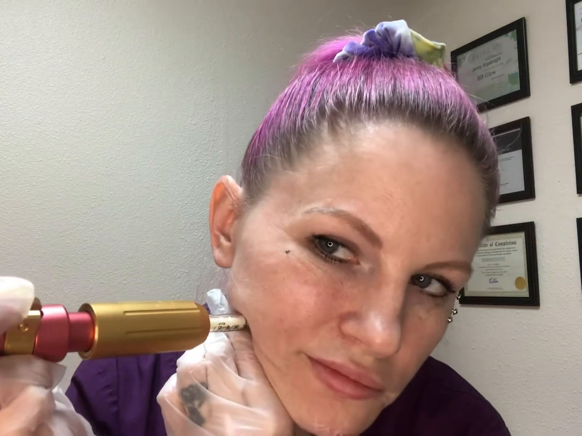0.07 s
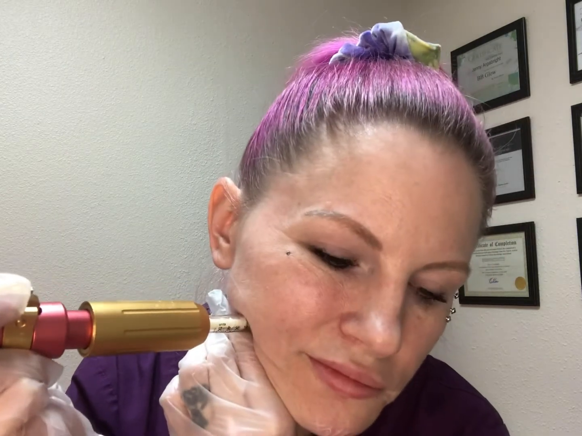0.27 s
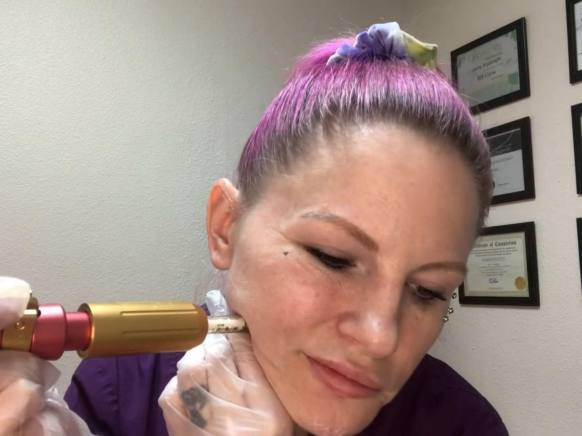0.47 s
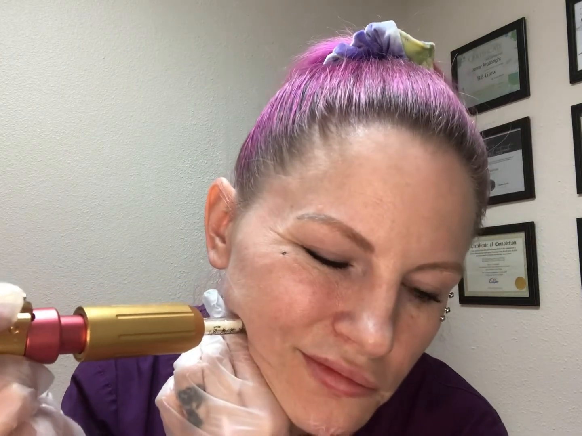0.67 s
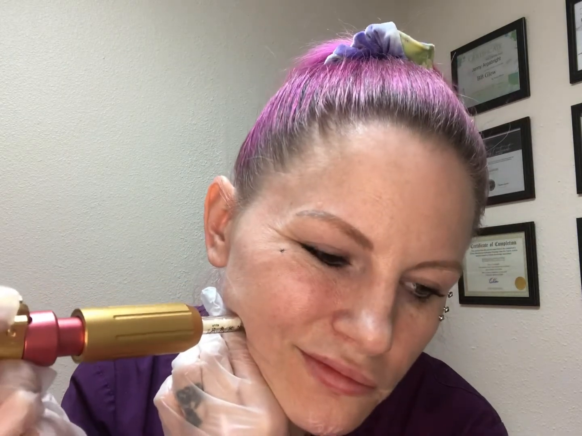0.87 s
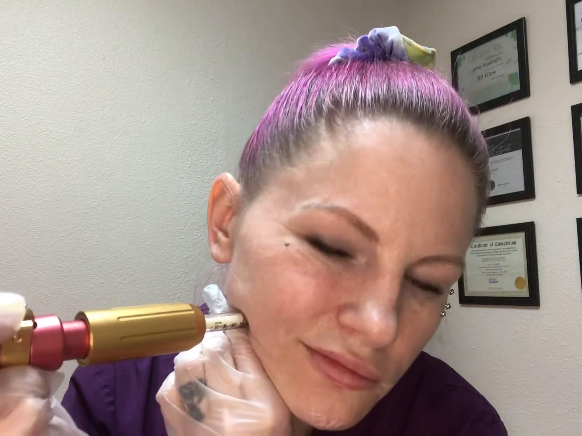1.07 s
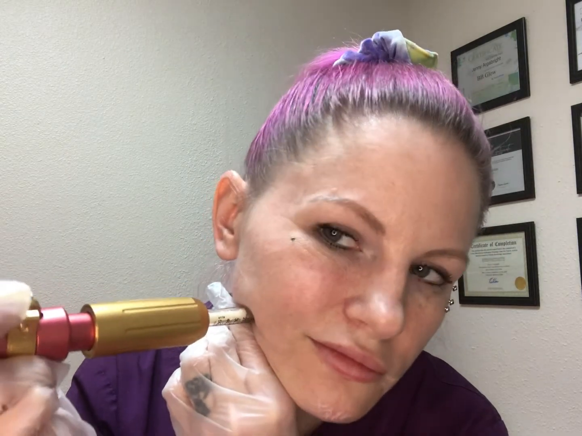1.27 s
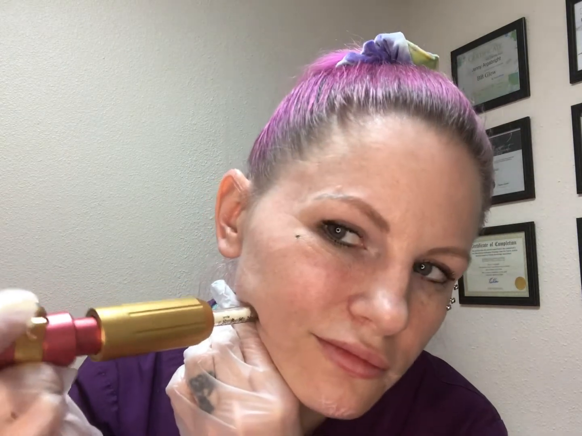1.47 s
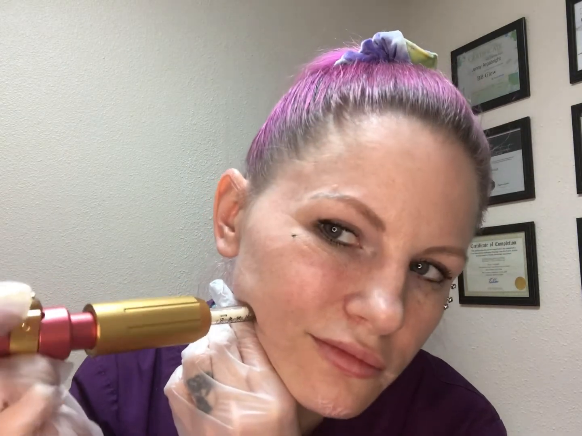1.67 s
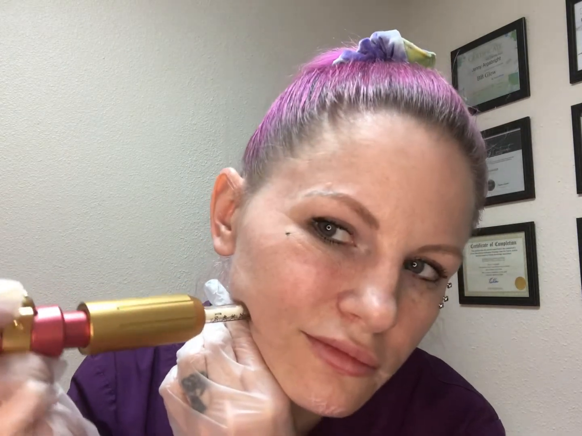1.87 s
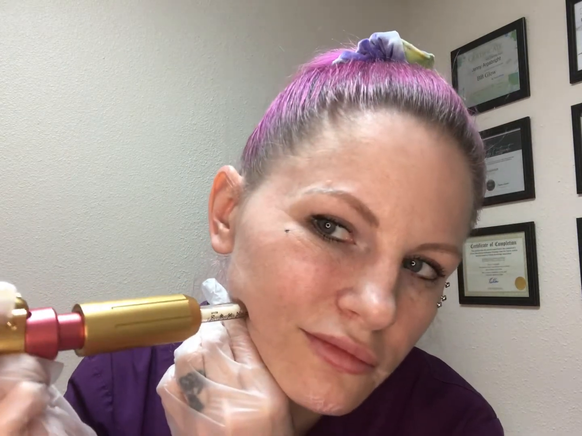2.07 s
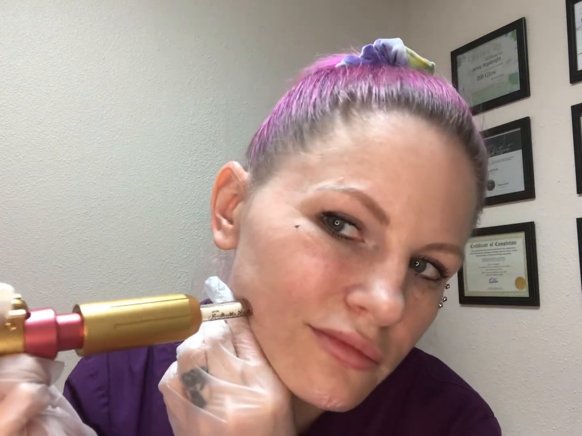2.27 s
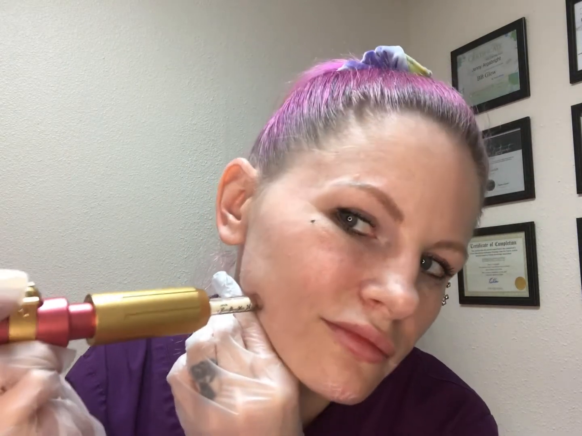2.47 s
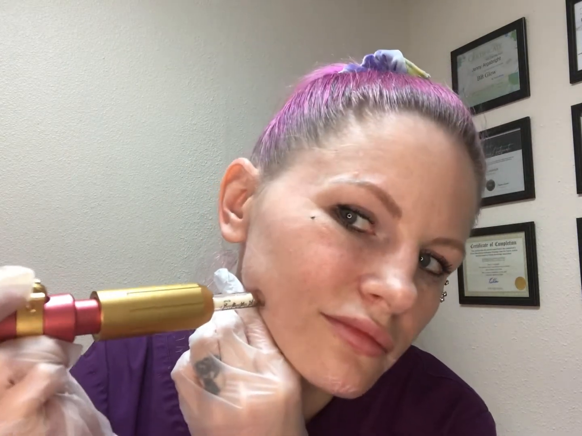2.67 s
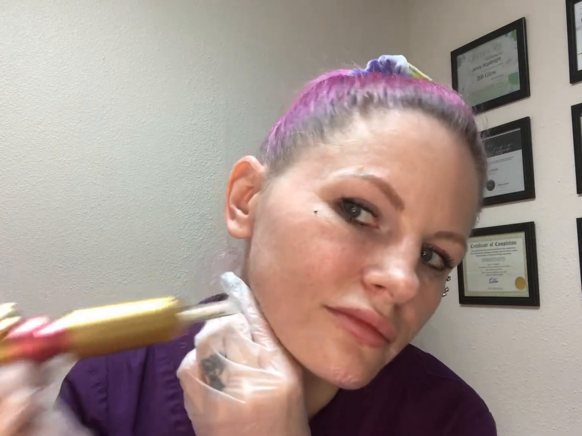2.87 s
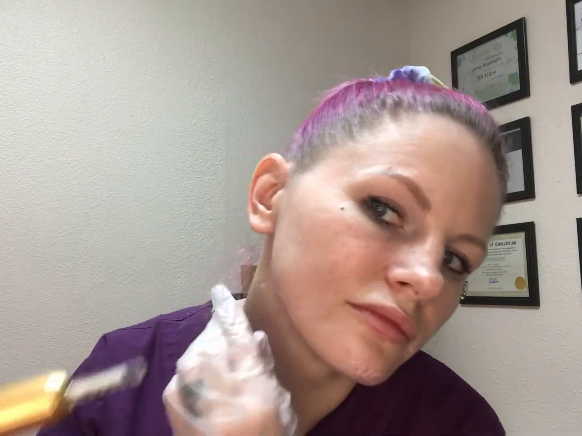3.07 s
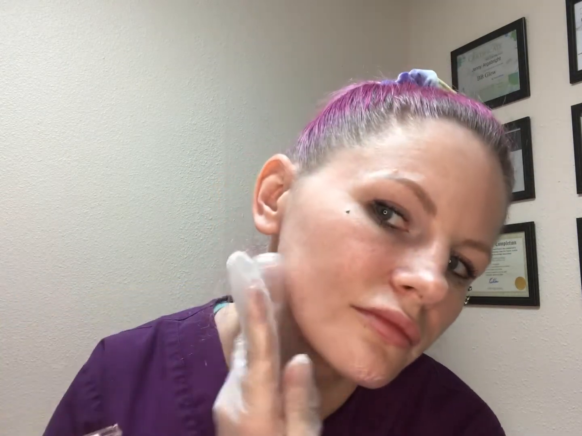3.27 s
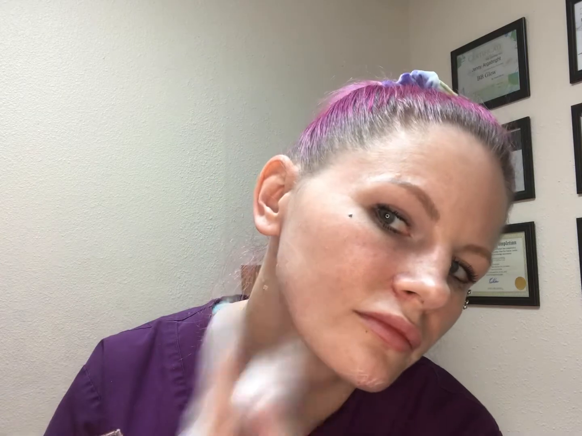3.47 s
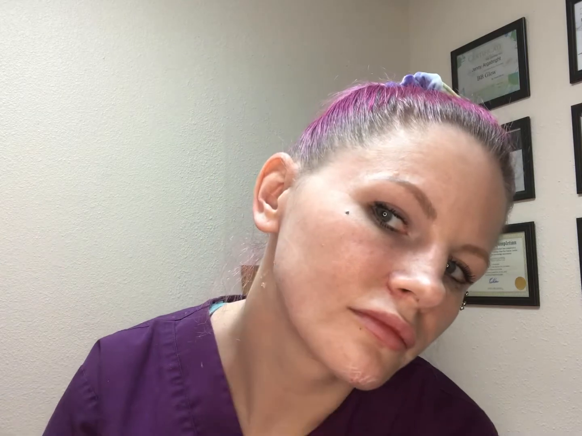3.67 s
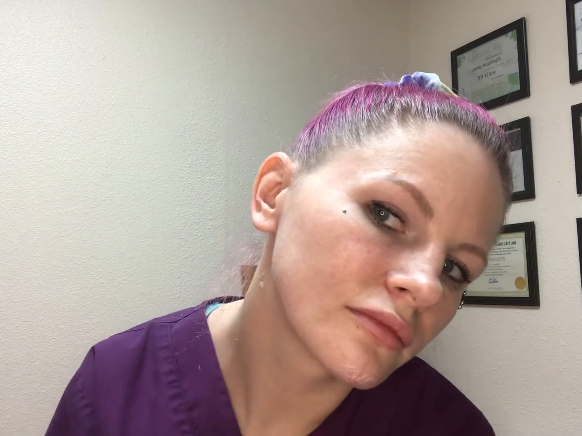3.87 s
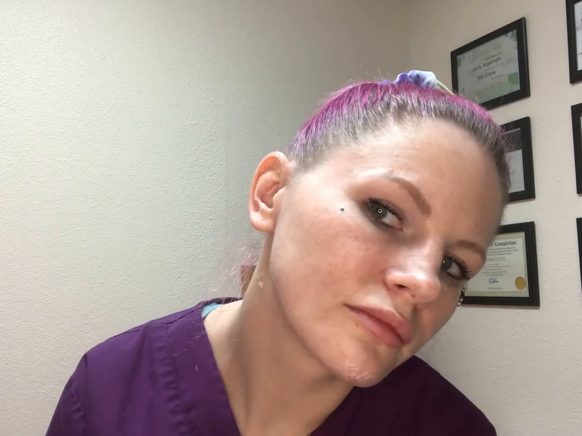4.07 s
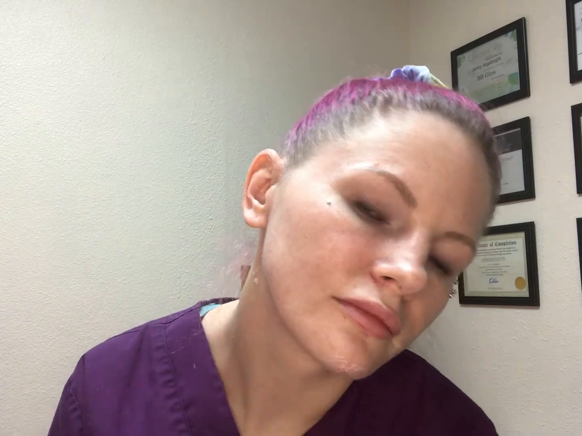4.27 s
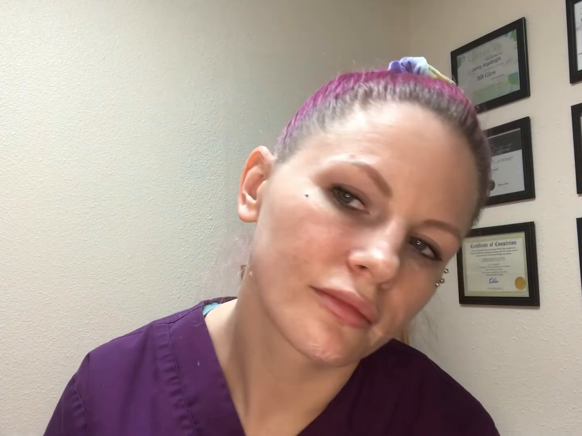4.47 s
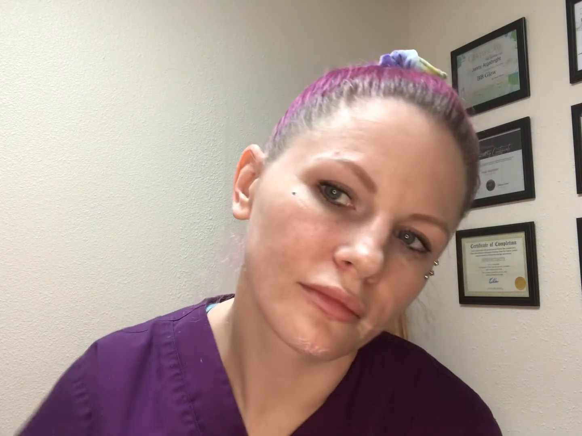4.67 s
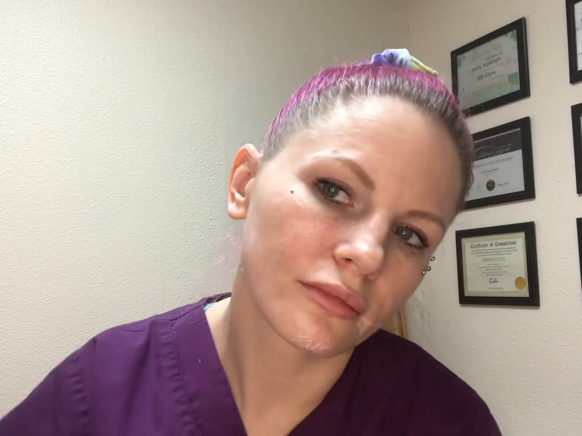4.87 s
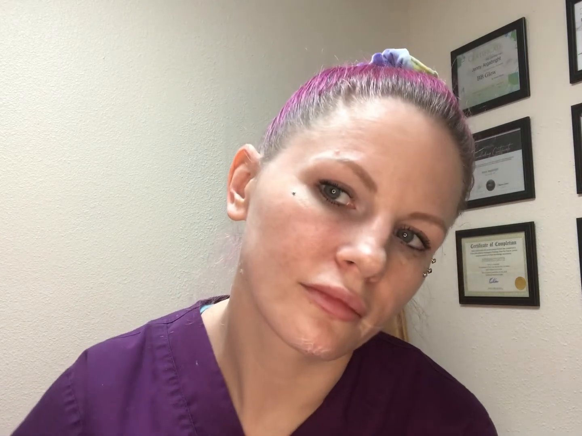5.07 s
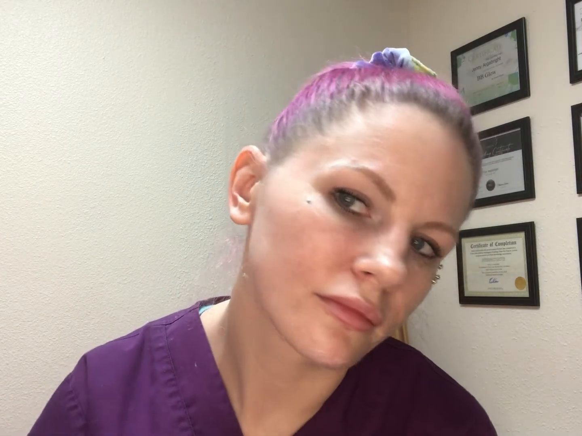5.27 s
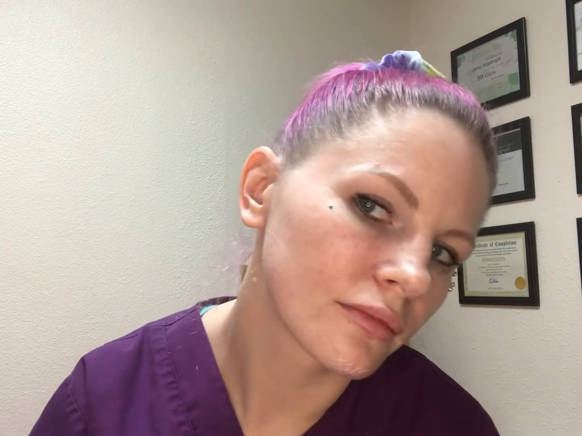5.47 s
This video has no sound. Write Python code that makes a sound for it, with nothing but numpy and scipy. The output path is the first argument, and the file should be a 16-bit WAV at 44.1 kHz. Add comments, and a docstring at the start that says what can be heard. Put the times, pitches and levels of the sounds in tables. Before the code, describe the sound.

Quiet room tone with low hum, hiss and very thin whines. A metal injector pen snaps once, early, extremely sharp and by far the loudest event, its short echo dying off the walls. Two quiet seconds pass with barely audible ticking. Then come dry glove and cloth rubs, small taps, a strong hard click late on, and fading rustle. Near, slightly bright small microphone, no speech.

```python
"""In a small hard-walled room, a spring-loaded injector pen fires near a laptop microphone: trigger ticks, then the
piston slams home. Later gloves and sleeves rustle and things are knocked on a desk; a clock-like tick comes about
once a second over the hum and thin whines of the room. Impacts and their early echoes are noise bursts plus damped
modes, cloth is modulated noise, the background is coloured noise plus wavering sines, and the walls answer with
decaying noise.
"""
import sys
import numpy as np
from scipy import signal
from scipy.fft import rfft, irfft
from scipy.io import wavfile
from scipy.ndimage import uniform_filter1d

SR = 44100
rng = np.random.default_rng(int(sys.argv[2]) if len(sys.argv) > 2 else 0)


def transcribe(signal):
    """Save signal, clipped to [-1, 1], as a 16-bit WAV file at the path in sys.argv[1]."""
    frames = np.atleast_2d(signal).T
    limited = np.clip(frames, -1, 1)
    pcm = np.round(limited * 32767).astype(np.int16)
    wavfile.write(sys.argv[1], SR, pcm)


N = 242991


def undb(db):
    """Decibel law: amplitude ratio of a level."""
    return 10 ** (np.asarray(db) / 20)


def unit(x):
    """Normalisation to an rms of 1."""
    return x / np.sqrt(np.mean(x ** 2))


def band(x, lo_hz, hi_hz):
    """Band-pass filtering between two cutoff frequencies."""
    edges = [lo_hz, min(hi_hz, 20000)]
    return signal.sosfilt(signal.butter(2, edges, "band", fs=SR, output="sos"), x)


def thin(x, hz):
    """High-pass filtering: the bass below the cutoff is taken away."""
    return signal.sosfilt(signal.butter(2, hz, "high", fs=SR, output="sos"), x)


def colour(x, points):
    """Spectral shaping: a gain curve through (frequency [Hz], gain [dB]) points, on a log frequency axis."""
    hz, db = np.transpose(points)
    f = np.maximum(np.fft.rfftfreq(len(x), 1 / SR), 1)
    gain = undb(np.interp(np.log(f), np.log(hz), db))
    return irfft(rfft(x) * gain, len(x))


def walk(rate_hz):
    """Slow random fluctuation: levels held for one period, then smoothed into ramps; rms 1."""
    hold = int(SR / rate_hz)
    steps = np.repeat(rng.standard_normal(N // hold + 1), hold)
    return unit(uniform_filter1d(steps, hold)[:N])


def add(out, x, start_s):
    """Superposition of one event on a longer signal, cut at its end."""
    i = int(start_s * SR)
    out[i:i + len(x)] += x[:N - i]


def crack(contact_ms, low_hz, low_db, high_db, size=2048):
    """Rattling contact: a short, even-coloured noise burst whose three bands are balanced by their peaks."""
    t = np.arange(size) / SR / (contact_ms / 1000)  # in contact times
    spectrum = rfft(rng.standard_normal(size) * t * np.exp(1 - 2 * t))
    flattened = irfft(spectrum / np.abs(spectrum) ** .75)
    burst = flattened * np.minimum(1.5 * t, 1) * np.exp(-t / 2)
    low = band(burst, low_hz / 1.5, low_hz * 1.5)
    middle = -band(burst, 3000, 7200)
    high = band(burst, 7200, 16500)
    gains = undb([low_db, 0, high_db])
    return sum(gain * part / np.abs(part).max() for gain, part in zip(gains, (low, middle, high)))


def ring(modes, size):
    """Modal vibration: damped sines set off together, each with a chance sign and strength."""
    t = np.arange(size) / SR
    out = np.zeros(size)
    for hz, db, t60 in modes:
        sign_draw, level_draw = rng.standard_normal(2)
        envelope = undb(db + 1.5 * level_draw - 60 * t / t60)
        out += np.sign(sign_draw) * envelope * np.sin(2 * np.pi * hz * t)
    return out


def air():
    """Stationary noise and tones: ventilation rumble, microphone hiss and slightly wavering whines."""
    # background spectrum: (frequency [Hz], relative level [dB])
    spectrum = [(12, -47.5), (20, -18), (63, -1.5), (117, -3), (184, -4), (244, -4.5), (566, -8),
                (729, -9.5), (913, -10.5), (994, -12), (1430, -14), (1950, -19), (3940, -20.5),
                (13900, -28), (16500, -44.5)]
    # thin whines: (frequency [Hz], rms level about which it wavers [dB])
    whines = [(118.4, -85.5), (920.5, -87.5), (1055, -89.5), (1448, -85.5), (1577, -83.5), (2369, -99),
              (3585, -101), (8624, -103)]
    noise_db = -70  # rms
    out = undb(noise_db) * unit(colour(rng.standard_normal(N), spectrum))
    for hz, db in whines:
        amplitude = np.sqrt(2) * undb(db + 1.5 * walk(8.3))
        phase = 2 * np.pi * np.cumsum(hz + 1.5 * walk(5.6)) / SR
        out += amplitude * np.sin(phase)
    return out


def injector():
    """Impact excitation: each arrival is a crack plus the metal body's ring; rows: direct, sent to the walls."""
    # trigger ticks, piston blows and their early echoes: (time [s], peak level of the crack's middle band [dB],
    # low band re middle [dB], high band re middle [dB])
    arrivals = [(0.5028, -43.5, -21, -2), (0.51, -51, -16, -1), (0.514, -50.5, 3.5, -2),
                (0.518, -53, 11.5, -11), (.5230, -14, -11, 0.5), (0.5246, -11.5, -12.5, 1.5),
                (.5260, -6, -11.5, -1.5), (0.5283, -21.5, -12, -0.5), (0.5317, -18.5, -9.5, 0.5),
                (0.5387, -18.5, -13, -3.5), (0.5386, -18.5, -12, -5.5)]
    # modes of the pen's metal body: (frequency [Hz], relative level [dB], decay time T60 [s])
    pen = [(108, -46, 0.091), (191.7, -31.5, 0.072), (380, -24, 0.072), (542, -25.5, 0.061),
           (765, -26.5, 0.026), (1390, -17.5, 0.0085), (2009, -45, 0.64), (2370, -18, 0.053),
           (4420, -5.5, 0.015), (4600, -42.5, 0.31), (5960, -10.5, 0.012), (7356, -18.5, 0.023),
           (9350, -11.5, 0.0085), (11000, -8.5, 0.0068), (12700, -9.5, 0.0052)]
    contact_ms, body_db, bass_hz = .7, -3.5, 129.7
    cracks, body = np.zeros(N), np.zeros(N)
    for s, db, low_db, high_db in arrivals:
        add(cracks, undb(db) * crack(contact_ms, 1250, low_db, high_db), s)
        add(body, undb(db + body_db) * ring(pen, size=SR // 3), s)
    return thin(np.array([cracks + body, cracks + .6 * body]), bass_hz)


def room(x, size=3 * SR // 4):
    """Diffuse reverberation: noise builds up after the first reflection and decays at each band's own rate."""
    # reverberation bands: (band frequency [Hz], decay time T60 [s], level before the frequency weighting [dB])
    decays = [(90, 0.22, -30.5), (205.1, .22, -19), (477, 0.3477, -18), (1030, 0.37, -26.5),
              (2180, 0.39, -27.5), (3980, 0.3, -28), (3550, 0.71, -41.5), (7240, 0.27, -28),
              (10320, 0.14, -24.5), (15050, 0.2, -25.5)]
    first_echo_s, build_s = 0.0044, 0.0045
    t = np.arange(size) / SR
    tail = np.zeros(size)
    for hz, t60, db in decays:
        noise = unit(band(rng.standard_normal(size), hz / 1.27, hz * 1.417))
        tail += undb(db - 60 * t / t60) * noise * np.sqrt(hz / 5000)
    rise = np.clip((t - first_echo_s) / build_s, 0, 1)
    return signal.fftconvolve(x, 0.2 * rise * tail)[:N]


def tick():
    """Periodic impulse excitation: a small hollow resonance struck at a steady beat."""
    start_s, every_s = .7165, 1.0561
    modes = [(1276, -50.5, .015), (1700, -66, .015), (3500, -70, .01)]  # (frequency [Hz], level [dB], T60 [s])
    out = np.zeros(N)
    for s in np.arange(start_s, N / SR, every_s):
        add(out, ring(modes, size=4096), s)
    return out


def handling():
    """Impact excitation: each arrival is a crack plus the desk's brief ring; rows: direct, sent to the walls."""
    # knocks, clicks and a few early echoes: (time [s], peak level of the crack's middle band [dB],
    # low band re middle [dB], high band re middle [dB], centre of the low band [Hz], share sent to the walls [dB])
    arrivals = [(1.2144, -61.5, -8, -18, 1114, -2), (2.1051, -64.5, -1, -21, 1574, 0),
                (2.6416, -64, -9, -21, 1594, -1), (3.141, -58, -21, -25, 918, -4),
                (3.1538, -60, -19, -26, 1160, -4), (3.3787, -57, -17, -16, 1230, -6),
                (3.4418, -57, -8, -11, 1144, -5), (3.716, -53, -22, -24, 1610, -2),
                (3.7213, -48, -25, -22, 1200, -1), (3.83, -54, -9, -9, 1690, -4),
                (3.9314, -48, -9, -13, 1180, -2), (3.952, -53, -21, -17, 1190, 0),
                (4.0793, -52, -15, -12, 1580, -4), (4.3458, -65.5, 10, -10, 1032, -5),
                (4.447, -54, -9, -5, 1080, 2), (4.457, -53, -1, -10, 1133, -2),
                (4.472, -59, 6, -10, 754, -5), (4.5073, -49, 5.5, -10, 1200, -7.5),
                (4.59, -42, -13, 10, 1060, -2.5), (4.6326, -37, -17.5, 4.5, 920, -2),
                (4.6576, -15.5, -22.5, -2, 1250, -1), (4.6665, -35, -9, -14, 1220, -5),
                (4.776, -60, 5, -15, 1500, -3), (4.9417, -67, 5, -11, 1250, -4),
                (4.965, -38, 4.5, 13, 1210, -3.5), (4.9742, -52, -5, -4, 1130, 1),
                (5.081, -54, -15, -22, 1156, -1), (5.1856, -41.5, 4.5, -2.5, 2150, -7)]
    # modes of the desk top and what lies on it: (frequency [Hz], relative level [dB], decay time T60 [s])
    desk_modes = [(430, -21, 0.03), (1198, -4.5, 0.021), (1624, -7, 0.023), (3960, 2, 0.021),
                  (6000, -13, 0.0035), (10250, 1, 0.014)]
    contact_ms, desk_db, bass_hz = 2.05, -9, 326
    wall_treble_db = -1.5  # treble beams at the microphone, so less reaches the walls
    direct, walls = np.zeros(N), np.zeros(N)
    for s, db, low_db, high_db, low_hz, room_db in arrivals:
        contact = crack(contact_ms, low_hz, low_db, high_db)
        desk = undb(desk_db) * ring(desk_modes, size=2048)
        add(direct, undb(db) * (contact + desk), s)
        add(walls, undb(db + room_db) * (contact + 0.62 * desk), s)
    walls = colour(walls, [(5000, 0), (9000, wall_treble_db)])
    return thin(np.array([direct, walls]), bass_hz)


def friction():
    """Power addition of slow movement and single rubs; rows: strength of the low, middle and treble band."""
    # slow movement of sleeves and gloves: (time [s], level [dB], treble re level [dB], low re level [dB])
    moving = [(2.65, -96, -1, 1), (2.78, -76.5, 0.5, 0), (3.1, -74.5, -3.5, 1.5), (3.26, -76.5, -5, -7),
              (3.5, -71, -3.5, 0), (3.7, -66, -3.5, -4), (4.03, -67.5, -1, -8.5), (4.28, -68, -4.5, -3.5),
              (4.38, -74, 0, 2), (4.58, -68.5, -8, -5), (4.88, -76, -2, -2), (5.059, -71.5, 1, -11.5),
              (5.155, -75.5, -1, -8), (5.2, -62.5, -6, -9), (5.28, -71.5, 3.5, -12.5), (5.36, -90, -9, -10)]
    # single rubs of glove and cloth: (start [s], length [s], level [dB], swell over the rub [dB],
    # treble re level [dB], low re level [dB])
    rubs = [(3.122, 0.037, -71.5, 4, -6, -10), (3.279, .095, -70.5, 3, -2, -12),
            (3.375, 0.026, -62, 2.5, -5.5, -12), (3.43, 0.043, -66, -4.5, -3, -14),
            (3.567, 0.036, -73, -4, 5, -3), (3.709, 0.15, -62.5, -5.5, 5.5, -11.5),
            (3.883, 0.08, -66, 7, 0, -10), (4.046, 0.042, -73, 5.5, 6, -6),
            (4.255, 0.023, -65, -2.5, -2, -4), (4.449, 0.058, -63, 3, -0.5, -1.5),
            (4.899, 0.083, -70.5, 6.5, 0.5, -8.5), (4.967, 0.072, -62, -2, 0, -11),
            (5.071, 0.013, -64.5, 0, -8, -3.5), (5.164, 0.025, -65.5, 6, 2, -15)]
    attack_s, release_s = .003, .012
    time = np.arange(N) / SR
    s, db, high_db, low_db = np.transpose(moving)
    levels = [np.interp(time, s, db + rel, left=-200, right=-200) for rel in (low_db, 0, high_db)]
    power = undb(2 * np.array(levels))  # doubled decibels square the amplitude
    for start, length, db, swell_db, high_db, low_db in rubs:
        t = time - start
        shape = np.clip(t / attack_s, 0, 1) * np.exp(-np.maximum(t - length, 0) / release_s)
        swell = swell_db * np.clip(t / length, 0, 1)
        balance = np.array([[low_db], [0], [high_db]])
        power += (shape * undb(db + swell + balance)) ** 2
    return np.sqrt(power)


def rustle():
    """Friction noise: dense creases of uneven size over a rubbing hiss; the pressure of the hand flickers."""
    # spectrum of rubbed cloth: (frequency [Hz], relative level [dB])
    cloth_spectrum = [(180, -26.5), (300, -9), (461, -4), (536, -2), (664, 1.5), (1230, 4.5), (2150, -3),
                      (4040, 3), (5530, -2), (7580, -1.5), (8650, -5.5), (13800, -6.5), (15700, -11.5)]
    bands_hz = (400, 2200), (2200, 7500), (7500, 20000)
    crease_sizes = undb(np.minimum(6.2 * rng.exponential(size=N), 12))
    creases = (rng.random(N) < 1500 / SR) * crease_sizes  # about 1500 a second
    grain = 1 + 1.06 * uniform_filter1d(unit(creases), size=40)
    hand_db = 0.5 * walk(60)
    out = np.zeros(N)
    for (lo, hi), strength in zip(bands_hz, friction()):
        gain = strength * undb(hand_db + 1.0 * walk(22))
        hiss = colour(grain * rng.standard_normal(N), cloth_spectrum)
        out += gain * unit(band(hiss, lo, hi))
    return out


def scene():
    """Superposition of direct sound, reverberation and background."""
    direct, walls = injector() + handling() + tick()  # the tick joins both rows
    cloth = rustle()
    return (direct + room(walls + 0.2 * cloth) + cloth + air())[None]


def record(dry):
    """Port resonance lifts the presence range; saturation rounds the loudest peak; a low-pass cuts the top."""
    # resonances of the microphone port: (frequency [Hz], width [Hz], added share of amplitude [1])
    port = [(4211, 420, 0.16), (7400, 900, 0.18)]
    top_hz = 16200
    heard = dry
    for hz, width, share in port:
        heard = heard + share * signal.lfilter(*signal.iirpeak(hz, hz / width, SR), dry)
    rounded = .9 * np.tanh(heard / .9)
    return signal.sosfilt(signal.ellip(8, .2, 70, top_hz, fs=SR, output="sos"), rounded)


dry = scene()
out = record(dry)
transcribe(out)
```